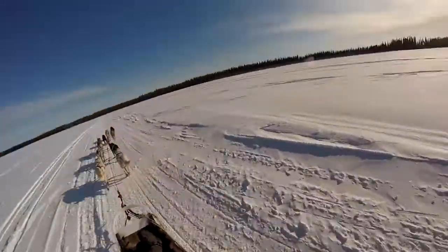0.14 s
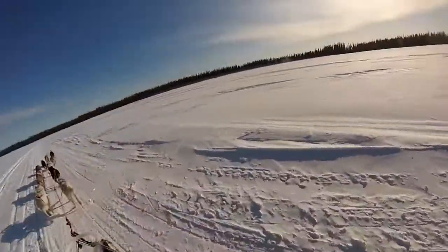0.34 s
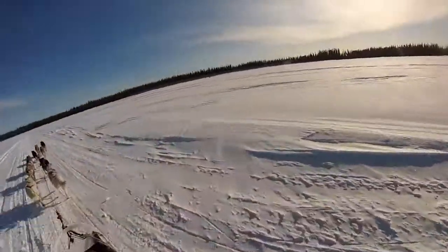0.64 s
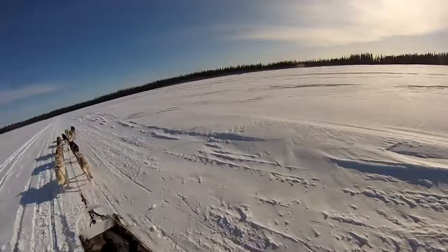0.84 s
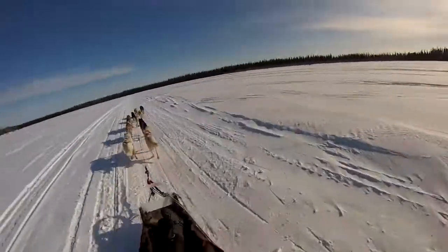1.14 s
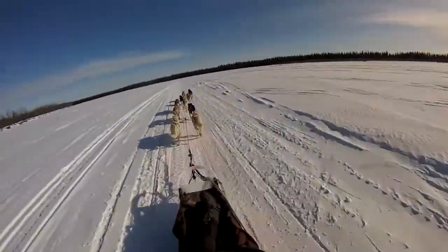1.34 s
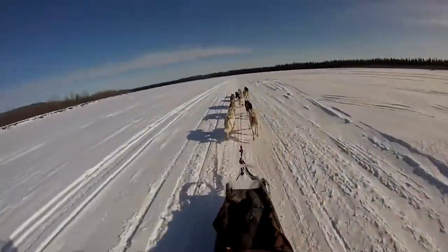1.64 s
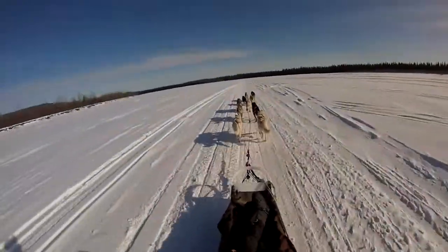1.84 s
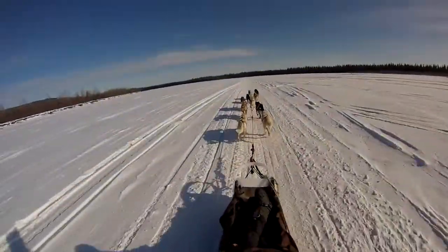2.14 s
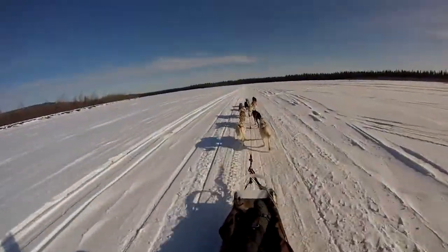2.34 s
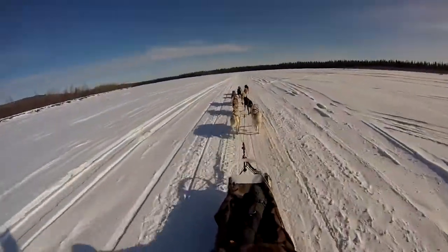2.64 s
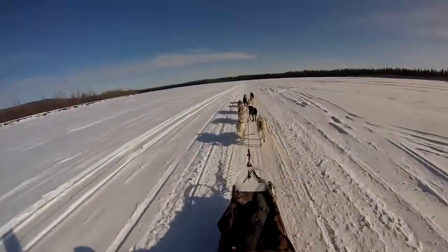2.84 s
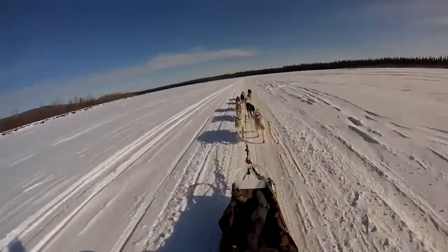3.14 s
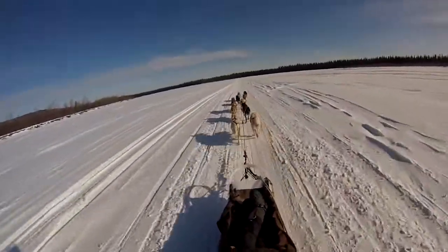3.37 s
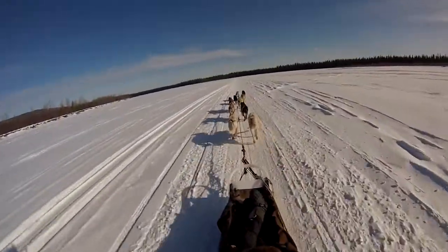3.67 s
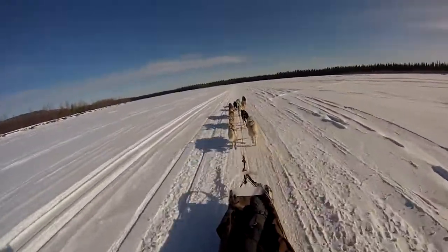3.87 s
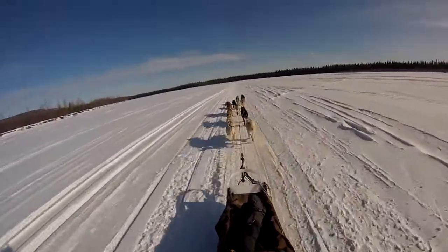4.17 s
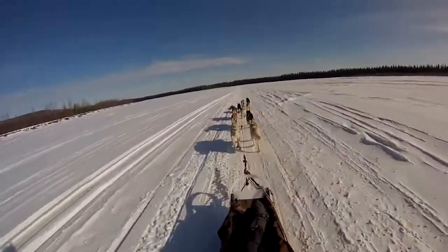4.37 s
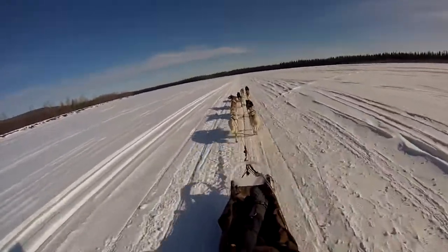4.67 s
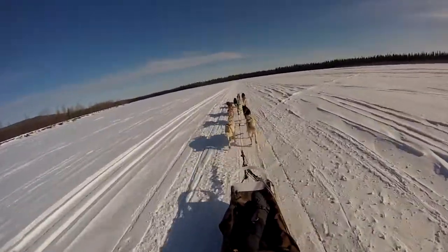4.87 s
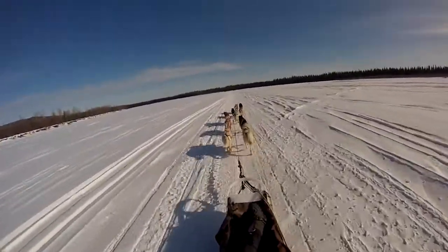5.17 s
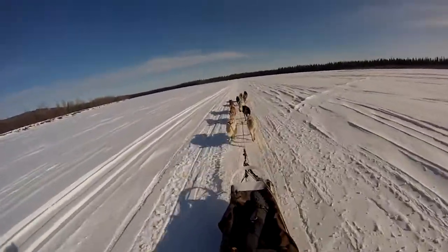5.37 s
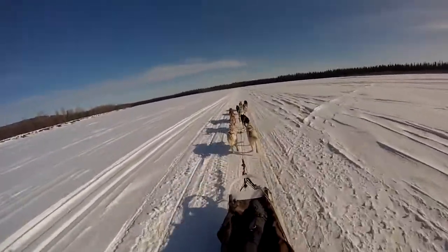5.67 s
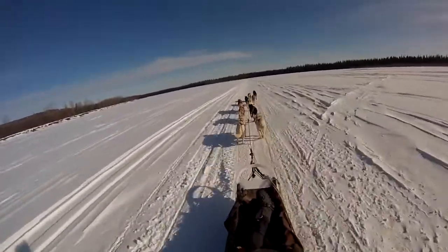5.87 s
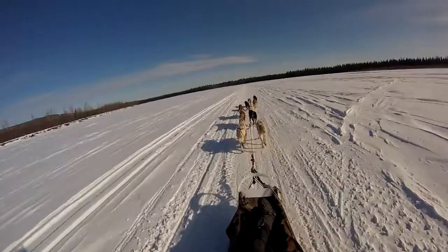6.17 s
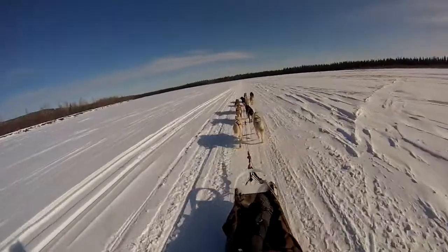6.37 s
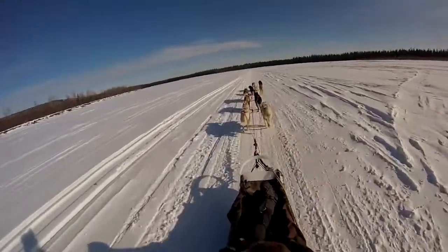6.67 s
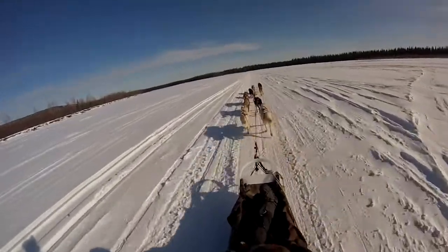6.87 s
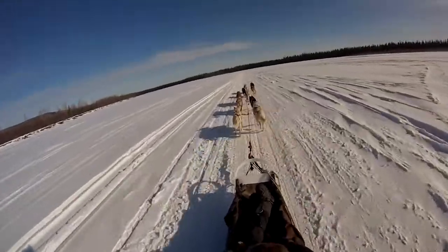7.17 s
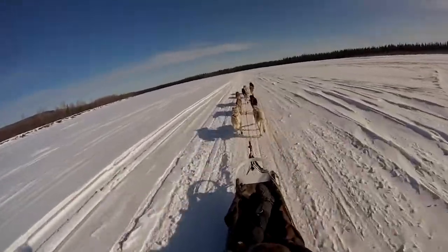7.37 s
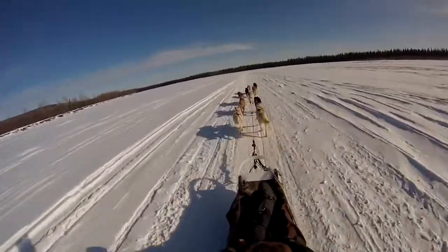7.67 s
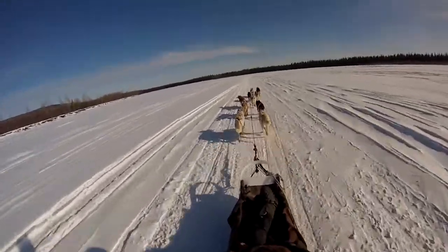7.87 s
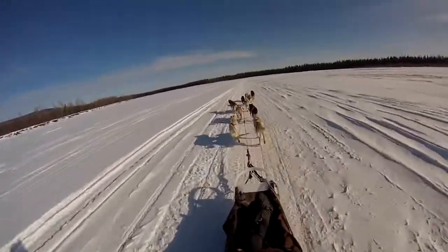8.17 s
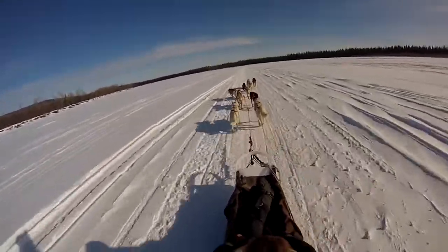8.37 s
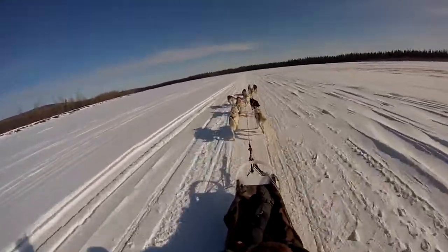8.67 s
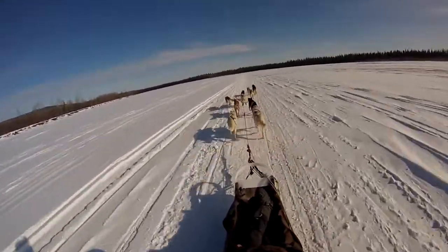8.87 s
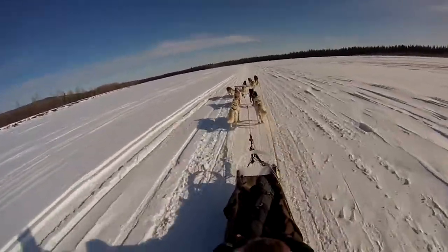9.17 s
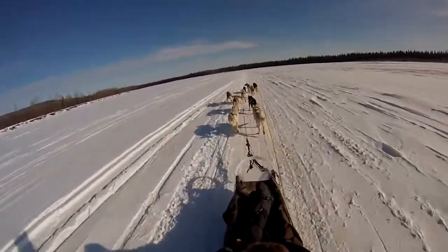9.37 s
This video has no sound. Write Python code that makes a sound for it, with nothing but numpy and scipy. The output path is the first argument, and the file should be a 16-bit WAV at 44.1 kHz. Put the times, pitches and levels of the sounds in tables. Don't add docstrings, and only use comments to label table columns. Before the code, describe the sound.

Deep head wind rumbles and slaps a small sealed camera while sled runners hiss over packed snow, with hollow case knocks and tiny plastic rattles.

```python
import sys
import numpy as np
from scipy import signal
from scipy.fft import rfft, irfft, next_fast_len
from scipy.io import wavfile
from scipy.ndimage import uniform_filter1d

SR = 44100
rng = np.random.default_rng(int(sys.argv[2]) if len(sys.argv) > 2 else 0)


def boost(x):
    u = np.asarray(x, float) / 20
    return 10 ** u


def wav_record(signal):
    frames = np.transpose(np.atleast_2d(signal))
    bounded = np.clip(frames, -1, 1)
    quanta = np.round(bounded * 32767).astype(np.int16)
    wavfile.write(sys.argv[1], SR, quanta)


N = 419391
TIME = np.arange(N) / SR

# start_s, peak_db, body_db, burst_ms, centre_khz
RATTLE_BURSTS = [
    (0.2922, -57, 1, 5.8, 4.2),
    (0.7974, -57, 3, 5.1, 4.2),
    (3.892, -44, -5, 6, 5.4),
    (4.1605, -50, 0, 5.9, 4.8),
    (4.2257, -42.5, 0.5, 5.4, 3.5),
    (7.1305, -55, 8, 5, 3.8),
    (7.4741, -54, 5.5, 4.4, 4.3),
    (8.1635, -49, 3, 5.5, 5),
]
# start_s, peak_db, body_db, centre_khz
LONE_TICKS = [(0.2783, -54, -4, 7.6), (1.522, -54, -7, 2.5), (1.8946, -56, -1, 3.6), (3.219, -54, 1, 4.5),
              (3.3583, -57.5, 0, 3.6), (3.9362, -48, -7, 5.1), (4.173, -55, -8, 9), (4.1915, -58, -8, 9),
              (4.2354, -59, -3, 4.5), (4.259, -54, -5, 4.5), (4.8407, -55, 2, 4.5),
              (5.2987, -47.5, -2, 7.9), (5.415, -69, -4, 4.5), (6.9845, -59, -8, 4.5),
              (7.1574, -57, 2, 4.5), (8.1762, -47.5, 5, 3.6), (8.3776, -41.5, 2, 3.9),
              (8.5947, -52.5, 1, 2.8), (8.611, -46, -10, 2.6), (8.624, -63, 6, 4.5),
              (9.12, -45.5, 4.5, 3.9)]


def level(x, db):
    return x * boost(db) / np.sqrt(np.mean(x ** 2))


def curves(table):
    s, *columns = np.transpose(table)
    return [np.interp(TIME, s, c) for c in columns]


def colour(x, points):
    hz, db = np.transpose(points)
    f = np.fft.rfftfreq(len(x), 1 / SR) + 1e-3
    return irfft(rfft(x) * boost(np.interp(np.log(f), np.log(hz), db)), len(x))


def ring(x, hz, width):
    return signal.lfilter(*signal.iirpeak(hz, hz / width, SR), x)


def lowpass(x, order, hz):
    return signal.sosfiltfilt(signal.butter(order, hz, fs=SR, output="sos"), x)


def walk(rate):
    k = int(SR / rate)
    steps = np.repeat(rng.standard_normal(N // k + 1), k)
    return 1.1 * uniform_filter1d(uniform_filter1d(steps, k), k)[:N]


def add(out, s, x):
    i = max(int(s * SR), 0)
    out[i:i + len(x)] += x[:N - i]


def swells(table, rise_s, fall_s):
    total = 0
    for s, hold, db in table:
        corners = [s - rise_s, s, s + hold, s + hold + fall_s]
        total = total + boost(2 * db) * np.interp(TIME, corners, [0, 1, 1, 0]) ** 2
    return total


def microphone_noise():
    # pitch_hz, density_db
    hiss_colour = [(300, 0), (3000, 0), (7000, -5), (10000, -9.5), (13000, -13.5), (16000, -14.5),
                   (20000, -17)]
    # pitch_hz, rms_db
    whines = [(8350, -116), (12550, -100)]
    hiss = level(colour(rng.standard_normal(N), hiss_colour), -71.5)
    return hiss + sum(boost(db + 3) * np.sin(2 * np.pi * hz * TIME) for hz, db in whines)


def chinks():
    # start_s, level_db, pitch_hz, width_hz, length_ms
    snaps = [(.2, -64, 2500, 600, 250), (.31, -70, 4660, 250, 90), (4.45, -80, 10500, 200, 60),
             (7.335, -69, 5150, 160, 35), (7.37, -73, 4750, 250, 80), (7.625, -72, 4650, 160, 30),
             (7.75, -74, 4600, 200, 60), (7.86, -74, 4650, 160, 20), (9.055, -71, 5200, 160, 40),
             (9.16, -68, 5000, 140, 40), (9.21, -65, 5200, 120, 27), (9.26, -69, 5300, 140, 80),
             (.79, -66, 2300, 400, 210), (1.2, -67, 2300, 400, 240), (5.12, -61, 2200, 503, 160),
             (7.04, -65, 2350, 300, 100), (7.42, -57, 2300, 250, 50)]
    out = np.zeros(N)
    rubs = rng.standard_normal((len(snaps), SR // 3))
    for (s, db, hz, width, ms), rub in zip(snaps, rubs):
        n = int(ms * SR / 1000)
        metal = ring(ring(rub, hz, width), hz, width)[-n:]
        add(out, s, np.sqrt(np.hanning(n)) * level(metal, db - 2.5))
    return out


def knocks():
    # start_s, peak_db, pitch_hz
    ridges = [(0.083, -38, 468), (1.112, -40.5, 509), (1.275, -40, 455), (1.883, -50, 545),
              (2.141, -39, 536), (2.296, -37, 510), (2.381, -42, 560), (2.897, -39, 470),
              (2.939, -38.5, 517), (5.363, -44, 512), (6.768, -34.5, 511), (7.08, -49, 460),
              (7.165, -39, 510), (7.3, -39.5, 490), (7.553, -36.5, 537), (7.725, -45, 520),
              (7.884, -38.5, 518), (8.162, -46, 467), (8.899, -43, 445), (9.107, -43, 470)]
    push_s, t60_s = 0.0012, 0.099
    out, t = np.zeros(N), TIME[:SR // 5]
    swell = (1 - np.exp(-t / push_s)) * np.exp(-np.log(1000) * t / t60_s)
    for s, db, hz in ridges:
        add(out, s, boost(db - 6) * swell / swell.max() * np.sin(2 * np.pi * hz * t))
    return out


def rattles():
    body_rings = [(1780, 2100, 0.59), (1190, 1850, 2.0), (600, 670, 2.26)]  # pitch_hz, width_hz, share
    out, t = np.zeros(N), TIME[:SR // 40]
    hits = list(RATTLE_BURSTS)
    hits += [(s + 0.0012, db, body_db, .3, khz) for s, db, body_db, khz in LONE_TICKS]
    chance = rng.standard_normal((len(hits), 2, len(t)))
    for (s, db, body_db, ms, khz), (size, where) in zip(hits, chance):
        swell = np.exp(-(t * 2000 / ms - 1) ** 4 * 2 + .3 * size)
        ticks = np.sign(size) * (where > 1.5) * swell * .7
        ticks[int(ms * SR / 2000)] = 1.1
        hz = np.clip(khz, 2.5, 12) * 1000
        edge = ring(ring(ticks, hz, 4000), hz, 4000)
        edge = edge + .08 * np.diff(ticks, prepend=0) + .55 * ring(ticks, 8500, 9500)
        body = sum(share * ring(ring(ticks, f, width), f, width) for f, width, share in body_rings)
        hit = edge / np.abs(edge).max() + boost(body_db + 5) * body / np.abs(body).max()
        add(out, s, boost(db + 4) * hit)
    return out


def runners(crunch_db=2.5, crunch_rate=4000, flicker_db=0.76):
    # start_s, hiss_db
    glide = [(0.0, -55), (0.21, -55), (0.58, -60.5), (0.79, -62), (1.34, -58), (2.42, -57), (2.6, -58),
             (3.73, -56.5), (3.89, -56), (4.82, -57), (5.13, -57.5), (5.39, -57.5), (6.21, -58.5),
             (6.92, -61), (7.29, -59), (8.63, -59.5), (8.89, -56.5), (9.45, -59.5)]
    # pitch_hz, density_db
    snow = [(88, -33), (150, 3), (172, 2.5), (337, -4), (526, -4.5), (788, -12.5), (1180, -14), (1560, -18),
            (2270, -19.5), (2880, -28.5), (4200, -40), (5460, -84), (9240, -120)]
    # pitch_hz, width_hz, lift_db
    case = [
        (517, 91, 2.5),
        (1208, 200, 2.5),
        (2253, 256, 5.5),
    ]
    # pitch_hz, width_hz, level_db
    powder = [(3560, 460, -2), (4650, 200, -1.5), (5150, 360, 1), (5950, 300, -6.5)]
    hiss_db, = curves(glide)
    over = hiss_db - -58
    hollow_db = -54.5 + 0.69 * over
    powder_db = -68.5 + 0.94 * over + 1.2 * walk(9)

    broken = rng.random(N) < crunch_rate / SR
    grain_size = boost(crunch_db * np.minimum(rng.exponential(size=N), 3))
    grains = broken * rng.standard_normal(N) * grain_size
    rub = colour(level(grains, -1.3) + rng.standard_normal(N), snow)
    rub = rub + sum((boost(db) - 1) * ring(rub, hz, width) for hz, width, db in case)
    hollow = lowpass(rub, 3, 750)
    hiss = rub - hollow
    spray = rng.standard_normal(N)
    top = sum(boost(db + 1.5 * walk(17)) * ring(spray, hz, width) for hz, width, db in powder)

    hollow = boost(hollow_db + flicker_db * walk(12)) * level(hollow, 0.75)
    hiss = boost(hiss_db + flicker_db * walk(14)) * level(hiss, 0.045)
    return hollow + hiss + boost(powder_db) * level(top, -5.0)


def wind(large_hz=60, small_hz=105, even=0.1, uneven_db=1.5):
    # start_s, level_db
    head_wind = [
        (0.0, -22.5),
        (0.53, -29),
        (1.96, -22),
        (2.41, -25),
        (2.94, -28.5),
        (3.52, -28.5),
        (3.89, -23.5),
        (5.56, -26.5),
        (7.84, -23),
        (9.51, -23.5),
    ]
    # pitch_hz, density_db
    eddies = [(8, -29), (14, 1.5), (21, 6.5), (38, 5.5), (51, -1.5), (79, -8), (120, -21), (168, -36),
              (250, -68.5)]
    # start_s, length_s, level_db
    gusts = [(0.025, 0.034, -18), (0.773, 0.021, -22), (0.898, 0.0316, -18), (1.514, 0.18, -20),
             (1.763, 0.088, -22.5), (1.867, 0.18, -18.5), (2.12, 0.014, -19.5), (2.233, 0.04, -23),
             (2.324, 0.03, -19), (2.712, 0.316, -18.5), (3.13, 0.021, -21.5), (3.228, 0.093, -20),
             (3.726, 0.25, -19), (4.016, 0.24, -17.5), (4.587, 0.277, -20), (4.96, 0.15, -17.5),
             (5.278, 0.043, -18), (5.998, 0.064, -18.5), (6.121, 0.011, -17), (6.315, 0.132, -21),
             (6.533, 0.037, -16), (6.664, 0.078, -22), (6.88, 0.027, -37), (7.018, 0.17, -21.5),
             (7.331, 0.256, -19), (7.718, 0.653, -19), (8.434, 0.04, -25.5), (8.579, 0.12, -17.5),
             (8.792, 0.027, -21.5), (8.887, 0.29, -19)]
    # start_s, length_s, level_db
    puffs = [(0.037, 0.044, -26), (0.166, 0.036, -28.5), (0.766, 0.13, -33.5), (1.34, 0.035, -27.5),
             (1.741, 0.045, -26.5), (1.885, 0.25, -29.5), (2.657, 0.29, -34), (3.124, 0.122, -31),
             (3.585, 0.19, -33), (3.86, 0.034, -36), (4.07, 0.177, -36), (4.609, 0.138, -32),
             (4.844, 0.177, -33), (5.788, 0.11, -33), (6.175, 0.049, -29), (6.382, 0.07, -34),
             (6.864, 0.056, -27.5), (7.072, 0.079, -34.5), (7.26, 0.035, -31), (7.398, 0.048, -37),
             (7.556, 0.12, -33), (7.798, 0.048, -35), (7.925, 0.032, -38), (8.165, 0.161, -34),
             (8.494, 0.3, -38), (8.972, 0.14, -29), (9.32, 0.053, -37)]
    # centre_s, push (+) or suction (-) in full scale, length_ms
    slap_events = [(0.8, -0.28, 15.6), (4.161, 0.33, 15.7), (4.228, -0.35, 14), (5.3, 0.31, 18.4),
                   (6.899, -0.23, 21), (7.133, -0.27, 18.4), (8.167, -0.31, 26), (8.183, 0.24, 34),
                   (8.597, -0.23, 30), (8.612, 0.3, 33), (9.12, -0.12, 16), (9.128, 0.22, 14.6),
                   (9.507, 0.14, 17.5)]

    air = colour(rng.standard_normal(N), eddies)
    large, most = lowpass(air, 4, large_hz), lowpass(air, 4, small_hz)
    gust_db = 10 * np.log10(boost(2 * curves(head_wind)[0]) + swells(gusts, 0.011, 0.038))
    over = gust_db - -25
    steady_db = -41.5 + 0.14 * over + uneven_db * walk(19)
    small_db = 10 * np.log10(boost(2 * steady_db) + swells(puffs, 0.009, 0.015))
    flutter_db = -49.5 + 0.12 * over

    out = np.zeros(N)
    for part, db in [(large, gust_db), (most - large, small_db), (air - most, flutter_db)]:
        swing = np.sqrt(uniform_filter1d(part ** 2, size=3000)) + 0.00075 * part.std()
        out += boost(db) * level(part / swing ** even, -1.9)

    slaps, calm = np.zeros(N), np.ones(N)
    for s, push, ms in slap_events:
        u = np.linspace(-3, 3, int(3 * ms * SR / 1000))
        add(slaps, s - 1.542 * ms / 1000, push * (1 - 0.27 * u ** 2) * np.exp(-2.5 * u ** 2))
        add(calm, s - 1.5 * ms / 1000, -.8 * np.exp(-u ** 2))
    return out * np.clip(calm, 0, 1) + slaps


def scene():
    return (wind() + runners() + knocks() + rattles() + chinks())[None]


def patchy_treble(sound):
    edges_hz = np.arange(8950, 15300, 350)
    size = next_fast_len(N + SR // 10)
    spec, f = rfft(np.pad(sound, (0, size - N), "reflect")), np.fft.rfftfreq(size, 1 / SR)
    out = irfft(spec * (f < edges_hz[0]), size)[:N]

    hits = list(RATTLE_BURSTS) + list(LONE_TICKS)
    ticked = sum(np.abs(TIME - s - .003) < .008 for s, db, *_ in hits if db > -56)
    first_s, every_s, length_s = .935, 1.001, 0.049
    refilled = np.abs((TIME - first_s + .5) % every_s - .5) < length_s / 2
    openness = -.95 + .75 * (walk(35) + .7 * walk(140)) + .35 * walk(4)
    openness = openness + 3.0 * (refilled + ticked) + .7 * (TIME < 1.1)
    for lo, hi in zip(edges_hz, edges_hz[1:]):
        favour = np.interp(lo, [9000, 12500, 12800, 15000], [3.3, 2.3, .3, -.3])
        odds = openness + .6 * walk(50) + 1.1 * walk(200) + favour
        kept = uniform_filter1d(1. * (odds > 0), size=130)
        out += kept * irfft(spec * (f >= lo) * (f < hi), size)[:N]
    return out


def roll_off(x):
    return signal.sosfilt(signal.butter(12, 15810, fs=SR, output="sos"), x)


def record(dry):
    mix = patchy_treble(dry[0] + microphone_noise())[None]
    return roll_off(mix)


dry = scene()
out = record(dry)
wav_record(out)
```